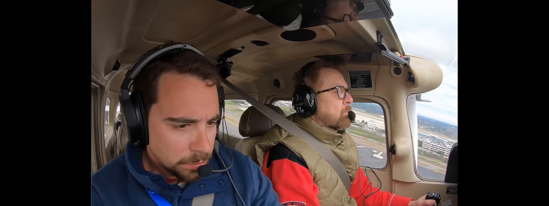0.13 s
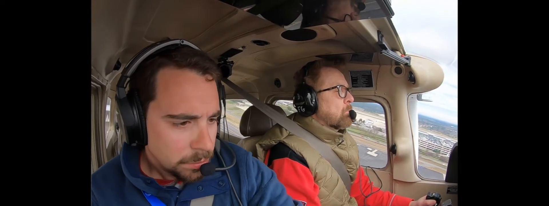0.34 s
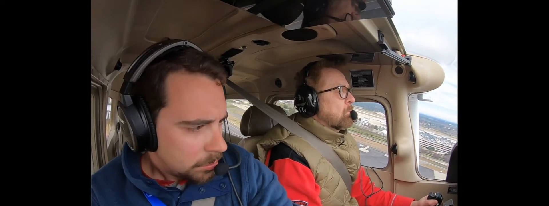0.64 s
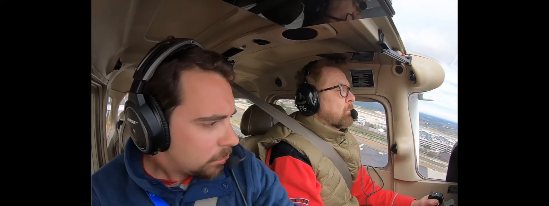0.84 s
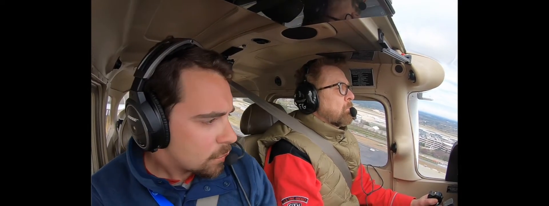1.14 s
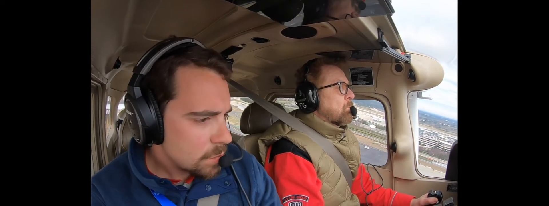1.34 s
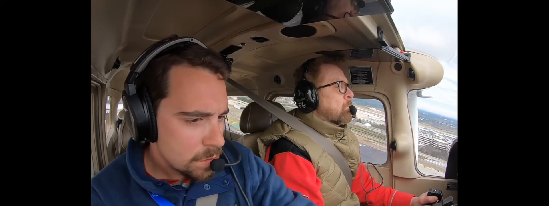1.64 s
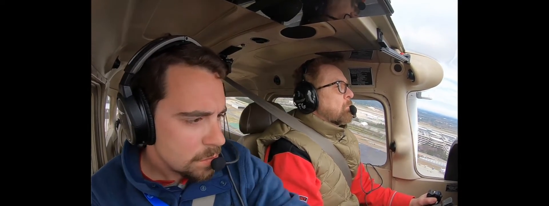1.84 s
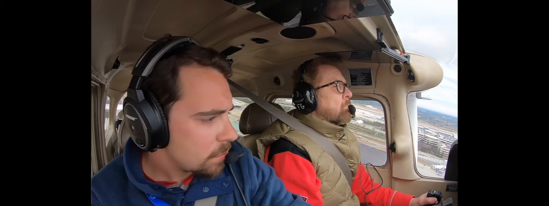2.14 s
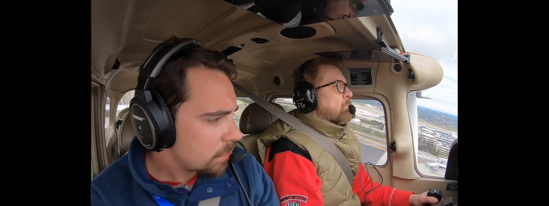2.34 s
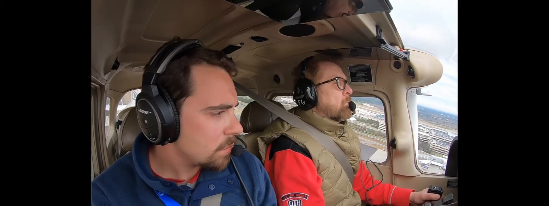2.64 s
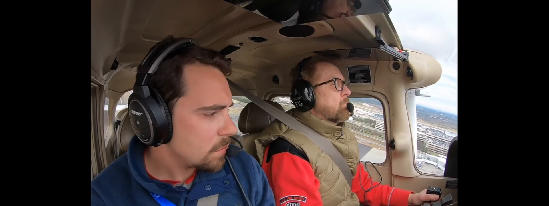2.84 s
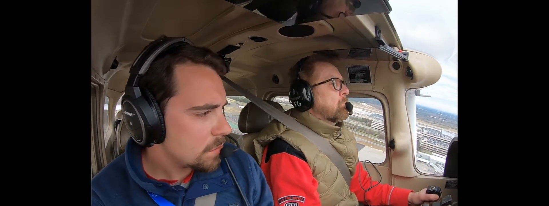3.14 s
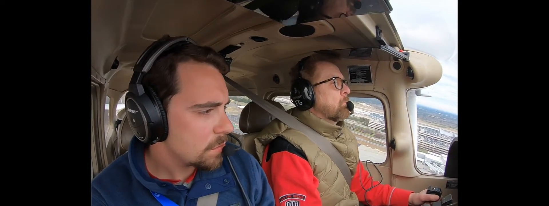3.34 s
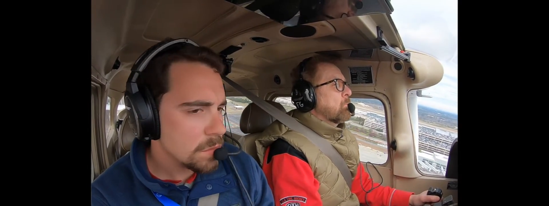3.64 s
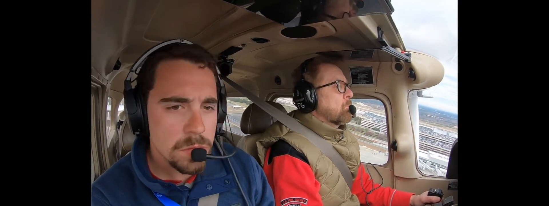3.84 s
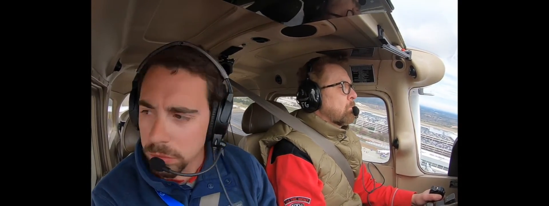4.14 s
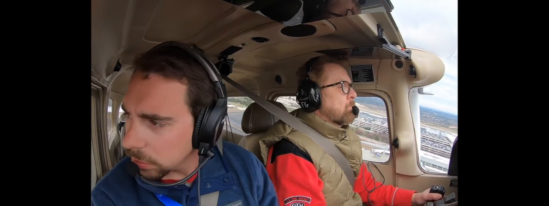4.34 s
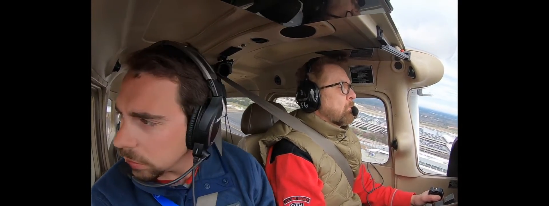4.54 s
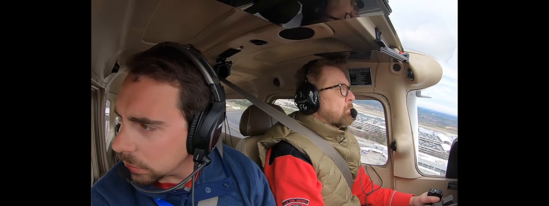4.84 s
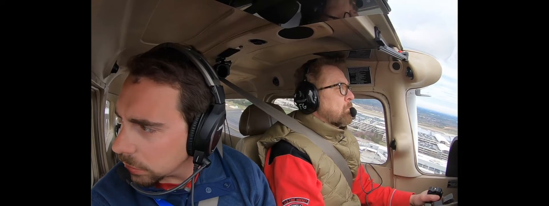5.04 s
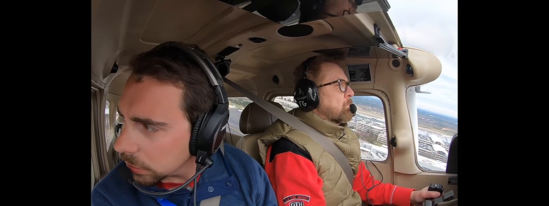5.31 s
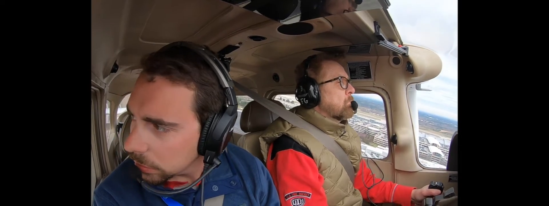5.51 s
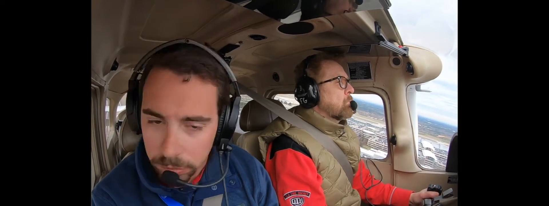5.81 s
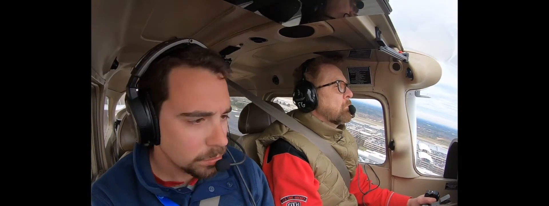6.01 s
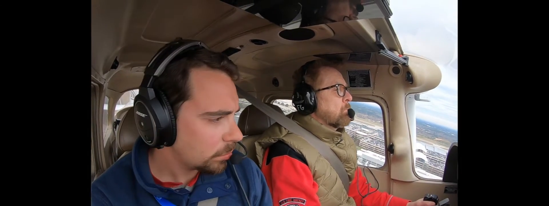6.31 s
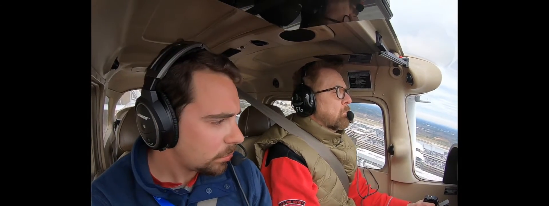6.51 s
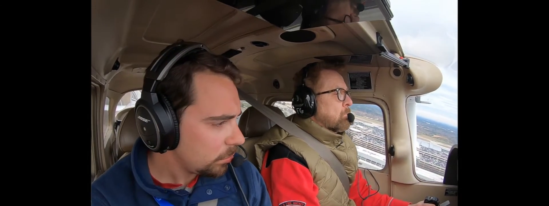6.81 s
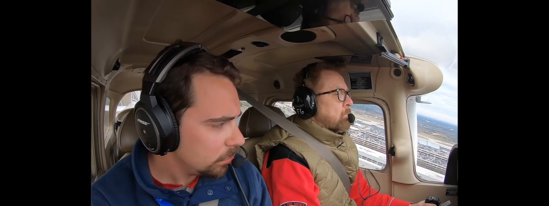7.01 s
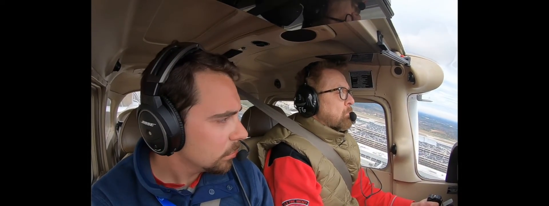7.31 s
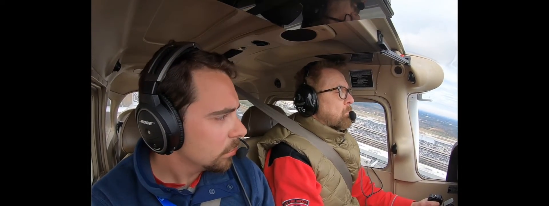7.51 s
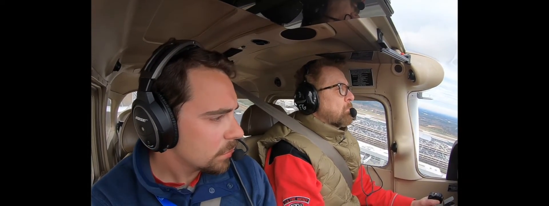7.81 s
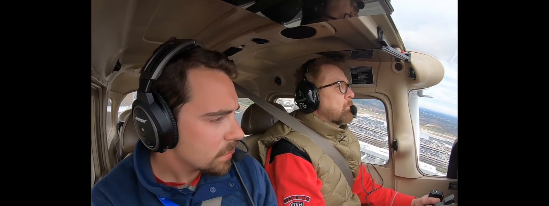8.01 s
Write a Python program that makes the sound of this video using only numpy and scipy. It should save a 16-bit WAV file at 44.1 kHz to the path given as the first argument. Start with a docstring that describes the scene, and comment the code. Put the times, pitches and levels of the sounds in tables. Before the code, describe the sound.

A small propeller plane's engine drones steadily from inside the cabin, over rumbling airflow, a soft hiss and a few low thumps.

```python
"""Inside a light aircraft climbing at full power. From the start, a four-cylinder engine and two-blade
propeller drone in shaft orders over the roar of exhaust and slipstream and the hiss of a vent.
Over the first 2.5 s a wider, brighter layer fades in: cabin air, alternator whine and a thin electrical
tone. Meanwhile one low thump lands at 0.4 s and a flutter of six around 2 s. The bright layer then
holds, and the drone's orders keep swelling and sinking to the end."""
import sys
import numpy as np
from scipy import signal
from scipy.io import wavfile
from scipy.ndimage import uniform_filter1d

SR = 44100
rng = np.random.default_rng(int(sys.argv[2]) if len(sys.argv) > 2 else 0)


def output_pcm(signal):
    """Save a mono or channel-first signal as 16-bit PCM at the path in sys.argv[1].

    Samples are clipped to [-1, 1] before scaling.
    """
    pcm = np.clip(np.atleast_2d(signal).T, -1, 1) * 32767
    wavfile.write(sys.argv[1], SR, np.round(pcm).astype(np.int16))


N = 359805


def engine():
    """Engine and propeller drone in orders of one shaft; also returns the running count of firings."""
    # climb power: (time [s], firing and blade rate [Hz])
    speed = [(0.0, 82.3), (1.0, 82.41), (2.0, 82.63), (2.6, 82.52), (4.0, 82.55), (4.5, 82.63),
             (6.5, 82.25), (7.0, 82.35), (8.15, 82.39)]
    # lead orders: (multiple of the firing rate)
    lead_orders = [2, 3, 5, 8]
    # they swell and sink in turn: (time [s], level of order 2 [dB], of 3 [dB], of 5 [dB], of 8 [dB])
    swells = [(0, -29.5, -20, -40, -38), (.65, -27, -19, -35, -32), (.85, -23, -20, -28, -31.5),
              (1.15, -19.5, -24.5, -20, -38), (1.45, -22, -28, -20, -35.5), (1.75, -21, -31, -24, -36.5),
              (2.0, -21.5, -28, -21, -38), (2.35, -18, -33, -24, -37.5), (2.75, -19.5, -23, -20.5, -34.5),
              (3.25, -24, -20.5, -23.5, -32.5), (3.5, -21, -23, -19.5, -32), (3.9, -19, -26, -21.5, -32.5),
              (4.2, -19.5, -23, -28, -31.5), (4.4, -15.5, -27, -28, -35), (4.6, -18, -34, -25, -38),
              (5.0, -21, -29.5, -21.5, -34.5), (5.45, -21, -23, -23.5, -32.5), (5.62, -22, -18, -36, -31.5),
              (5.95, -22, -22, -35, -32.5), (6.2, -23, -19.5, -26, -32), (6.55, -24.5, -18.5, -30, -32.5),
              (7.0, -24, -24.5, -27, -31), (7.25, -22.5, -26, -29, -29.5), (7.6, -20.5, -24.5, -23, -36),
              (7.85, -22, -26, -19.5, -34), (8.16, -21, -24, -20, -38)]
    # strong orders that ride those swells: (multiple, mean level [dB], share of 2, 3, 5, 8 [dB per dB])
    followers = [(1, -15, -0.43, -.05, .1, .12), (4, -30, 0.66, -.1, .35, -.1),
                 (6, -36, 0.4, .05, .05, -.1), (7, -41, 0.1, .3, -.3, .1), (10, -38.5, -0.1, .05, .1, .25)]
    # weak orders, the quarters from unequal cylinders: (multiple, level [dB])
    weak_orders = [(.5, -43), (.75, -56), (1.25, -38.5), (1.5, -38), (1.75, -34.5), (2.25, -40),
                   (2.75, -44), (3.25, -41.5), (3.5, -51), (4.5, -65), (4.75, -49), (5.5, -42.5),
                   (5.75, -51), (6.25, -43), (6.75, -59), (7.25, -48.5), (8.25, -51), (8.75, -48.5),
                   (9, -42.5), (9.25, -45), (9.5, -47), (9.75, -45), (11, -55.5), (12, -49.5), (13, -50.5),
                   (15, -47), (16, -63.5), (18, -63)]
    firings = np.cumsum(curves(speed)[0]) / SR
    lead_db = np.array(curves(swells))
    swing_db = lead_db - lead_db.mean(axis=1, keepdims=True)
    levels = list(zip(lead_orders, lead_db))
    levels += [(k, db + np.dot(shares, swing_db)) for k, db, *shares in followers]
    strong = 0
    for k, db in levels:
        lag = .175 * (k - 1)  # cycles: each higher order reaches the ear a little later
        flip = (k > 4.5) / 2  # the cabin inverts the orders above the fourth
        strong += partial(k * firings - lag + flip, db, waver_db=.07 * k + .35, waver_hz=10, slip=.03 * k)
    weak = sum(partial(k * firings + rng.random(), db, 1.0, 5, 0.19) for k, db in weak_orders)
    return strong + weak, firings


def roar(firings):
    """Exhaust and slipstream rumble through the aircraft's skin, pulsing with each blade pass."""
    # dark noise colour: (frequency [Hz], relative level [dB])
    spectrum = [(12, -30), (28, -17), (42, -2.5), (62, -11), (95, -4), (130, -7.5), (260, -6.5), (400, -10),
                (500, -9), (620, -23), (800, -18.5), (1100, -22), (1400, -29.5), (1800, -28), (3200, -53.5)]
    # slow level ride: (time [s], level [dB])
    ride = [(0, -24.5), (2, -22.5), (5, -23.5), (6.9, -25.5), (8.16, -24)]
    blade_pulse = 1 + 0.062 * np.cos(2 * np.pi * firings)
    return gain_of(curves(ride)[0]) * blade_pulse * noise(spectrum, patchy_db=0.54)


def vent():
    """A fresh-air vent hisses, with peaks near 2.5 and 4.4 kHz."""
    # hiss colour: (frequency [Hz], relative level [dB])
    spectrum = [(1900, -17), (2150, -9), (2480, -2.5), (2750, -12.5), (3200, -14.5), (3900, -12.5),
                (4400, -1), (5200, -3), (6300, -11.5), (7200, -22.5), (9500, -27), (11000, -46),
                (12500, -41), (15700, -56)]
    # slow level ride: (time [s], level [dB])
    ride = [(0, -42.5), (2.5, -42), (5, -41), (6.9, -44), (8.16, -42.5)]
    return gain_of(curves(ride)[0]) * noise(spectrum, patchy_db=0.69)


def cabin(firings):
    """Mid and side of the layer that fades in: air hiss, alternator whine, electrical tone, stereo width."""
    # air hiss alike in both ears: (frequency [Hz], relative level [dB])
    air_mid = [(100, -5.5), (700, 3.5), (1500, -11.5), (3000, -15.5), (5000, -18.5), (7000, -18.5),
               (10000, -17), (13000, -22.5), (15700, -31)]
    # stereo hiss, with a deep gap from 4 to 5.5 kHz where the sound narrows to the centre:
    # (frequency [Hz], relative level [dB])
    stereo_hiss = [(15, -11.5), (80, -9), (180, 3.5), (380, -9.5), (750, 2), (1500, -6), (3200, -15.5),
                   (3750, -29), (4000, -67), (5450, -66), (5700, -22.5), (9950, -16.5), (14800, -23),
                   (15700, -29)]
    # alternator whine: (multiple of the ripple rate, level over the air fade [dB])
    whine_orders = [(2, -2), (3, -9.5), (4, -12), (5, -8), (9, -17), (10, -25), (11, -16), (12, -15.5),
                    (13, -20), (14, -26), (15, -17), (16, -27), (17, -35), (18, -33), (19, -36)]
    # thin electrical tone: (frequency [Hz], level over the tone fade [dB])
    tone_partials = [(7812.5, 4.5), (15625, -25)]
    # drone that differs left to right: (multiple of the firing rate, level over the width fade [dB])
    side_orders = [(1, -24), (2.002, -13), (2.25, -4), (3, -8)]
    air_fade = fade(start_db=-80, full_db=-48.5, bend=1.4)
    width_fade = fade(start_db=-91, full_db=-48.5, bend=2.65)
    tone_fade = fade(start_db=-71, full_db=-55.5, bend=1.4)
    ripples = 9.819 * firings  # the pulley gears the alternator to the engine
    whine = sum(partial(k * ripples + rng.random(), db, 2.2, 7, 0.088 * k) for k, db in whine_orders)
    tone = sum(partial(hz * np.arange(N) / SR, db, 0.87, 9, .15) for hz, db in tone_partials)
    tone *= tone_fade
    mid = gain_of(12.5) * noise(air_mid, patchy_db=0.68) + whine
    side = gain_of(8.0) * noise(stereo_hiss, patchy_db=1.5)
    side += sum(partial(k * firings, db, 0.92, 5, 0.55) for k, db in side_orders)
    return air_fade * mid + tone, width_fade * side + gain_of(-24) * tone


def thumps():
    """Sudden dips of pressure that swing back; the right side takes more, after a short snap."""
    # low thumps at the microphone: (time [s], dip [dB], excess on the right [dB], snap on the right [dB])
    hits = [(0.3982, -15.5, -5, -4), (1.787, -17, -28, -32), (1.847, -18, -19, -22), (1.907, -22, -10, -18),
            (1.967, -20, -18, -20), (2.029, -17, -23, -15), (2.087, -14, -16, -16)]
    t, out = np.arange(3000) / SR, np.zeros((2, N))
    dip = -(0.5 + np.cos(2 * np.pi * 38 * t)) * np.exp(-t / 0.023) * (1 - np.exp(-(t / 0.0018) ** 2))
    excess = -np.exp(-t / 0.012) * (1 - np.exp(-(t / 0.0014) ** 2))
    snap = np.exp(-((t - .0015) / 0.00036) ** 2)
    for start_s, dip_db, excess_db, snap_db in hits:
        at = round(start_s * SR)
        out[:, at:at + len(t)] += gain_of(dip_db) * dip
        out[1, at:at + len(t)] += gain_of(excess_db) * excess + gain_of(snap_db) * snap
    return out


def partial(cycles, db, waver_db, waver_hz, slip):
    """A sine at an rms level of db; its level drifts by waver_db and its phase by slip radians."""
    amplitude = np.sqrt(2) * gain_of(db + waver_db * wander(waver_hz))
    return amplitude * np.cos(2 * np.pi * cycles + slip * wander(waver_hz))


def noise(spectrum, patchy_db):
    """Coloured noise of rms 1, with patches that drift louder and softer across time and frequency."""
    frames, hz = N // 512 + 5, np.fft.rfftfreq(2048, 1 / SR)
    real, imag, patches = rng.standard_normal((frames, len(hz), 3)).T
    patches = unit_rms(uniform_filter1d(uniform_filter1d(patches, size=20, axis=0), size=8, axis=1))
    point_hz, point_db = np.transpose(spectrum)
    colour_db = np.interp(np.log(hz + 1), np.log(point_hz + 1), point_db)[:, None]
    bins = (real + 1j * imag) * gain_of(colour_db + patchy_db * patches)
    return unit_rms(signal.istft(bins, nperseg=2048, noverlap=1536)[1][:N])


def wander(rate_hz):
    """Slow random drift of rms 1."""
    return unit_rms(np.interp(np.arange(N) / SR * rate_hz, np.arange(400), rng.standard_normal(400)))


def fade(start_db, full_db, bend, fade_s=2.48):
    """Gain that swells and then holds; a bend over one makes it start slowly."""
    rise = np.minimum(np.arange(N) / SR / fade_s, 1) ** bend
    return gain_of(start_db) + (gain_of(full_db) - gain_of(start_db)) * rise


def curves(rows):
    """Each column after the time as a straight-line envelope, one value a sample."""
    times, *columns = np.transpose(rows)
    return [np.interp(np.arange(N) / SR, times, column) for column in columns]


def gain_of(db):
    return 10 ** (np.asarray(db) / 20)


def unit_rms(x):
    return x / np.sqrt(np.mean(x ** 2) + 1e-20)


def scene():
    """Drone, roar and vent sit in the centre; the cabin layer opens up the stereo width."""
    drone, firings = engine()
    cabin_mid, side = cabin(firings)
    mid = drone + roar(firings) + vent() + cabin_mid
    return np.array([mid + side, mid - side]) + thumps()


def record(dry):
    """A steep low-pass trims the very top of the treble."""
    lowpass = signal.firwin(2047, cutoff=15730, window=("kaiser", 9), fs=SR)
    return signal.oaconvolve(dry, lowpass[None], "same")


dry = scene()
out = record(dry)
output_pcm(out)
```